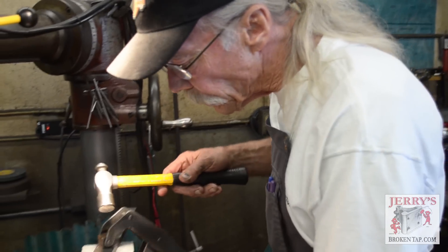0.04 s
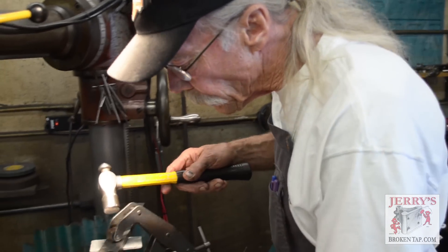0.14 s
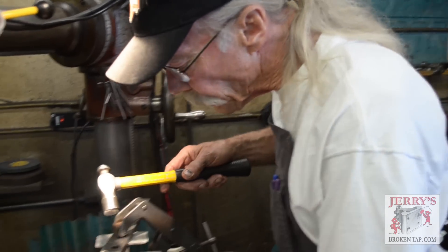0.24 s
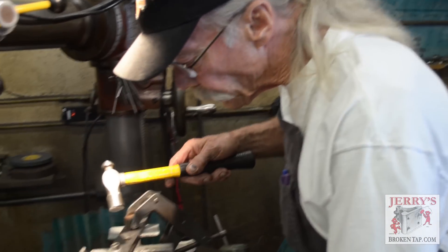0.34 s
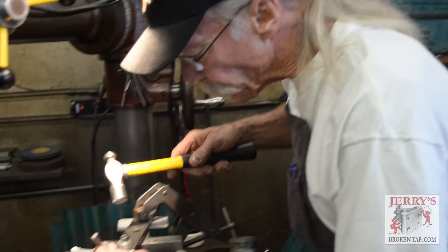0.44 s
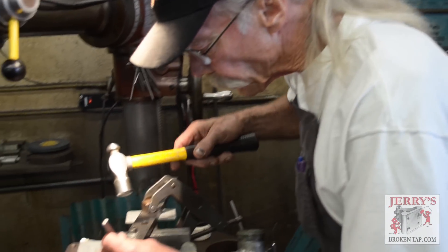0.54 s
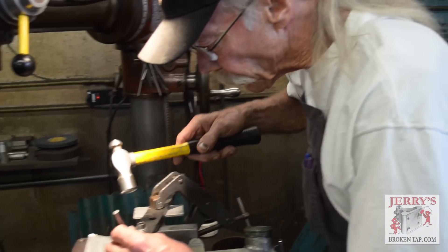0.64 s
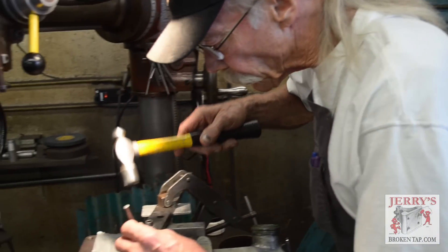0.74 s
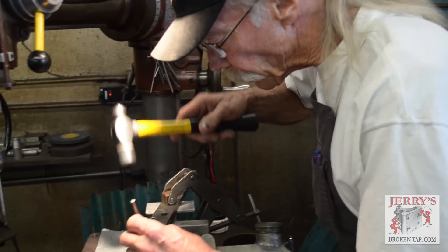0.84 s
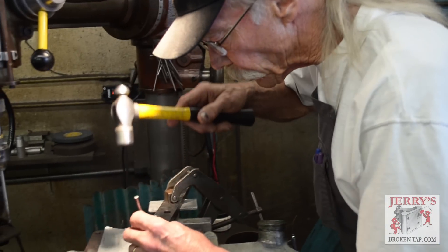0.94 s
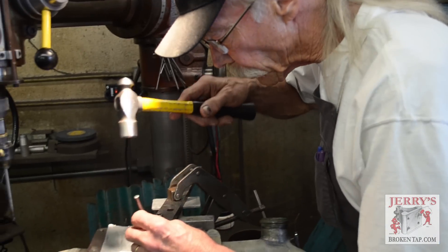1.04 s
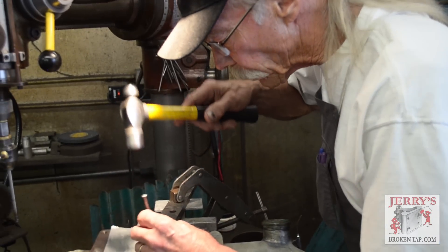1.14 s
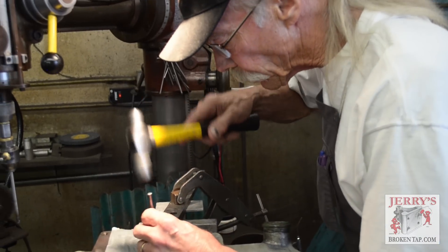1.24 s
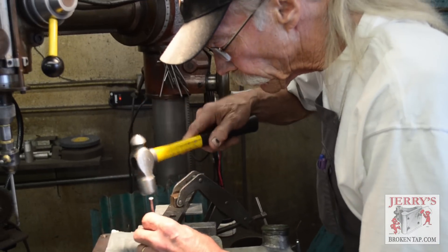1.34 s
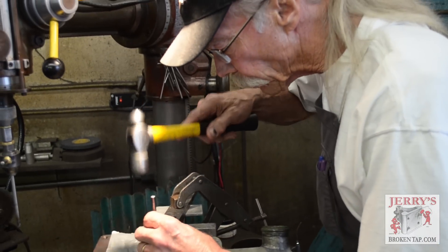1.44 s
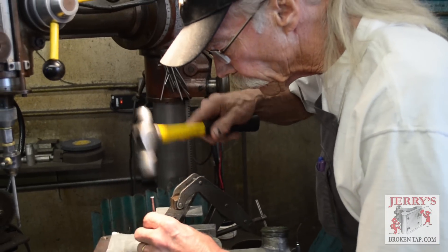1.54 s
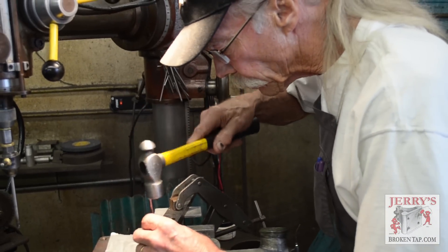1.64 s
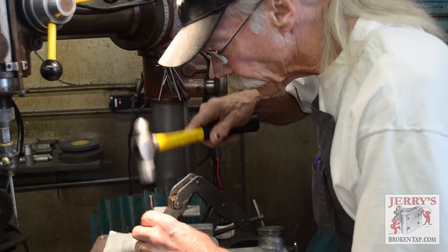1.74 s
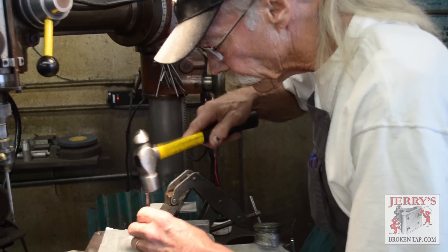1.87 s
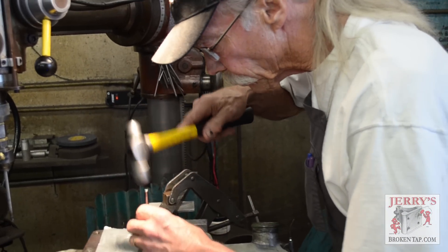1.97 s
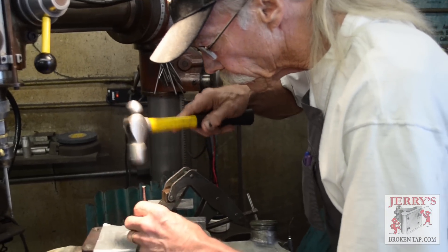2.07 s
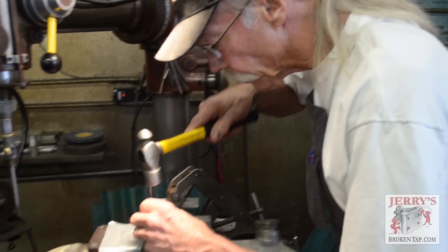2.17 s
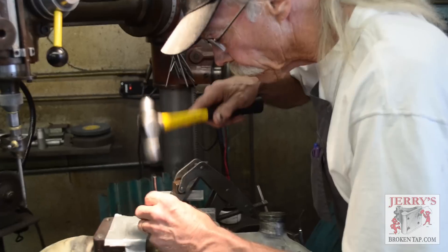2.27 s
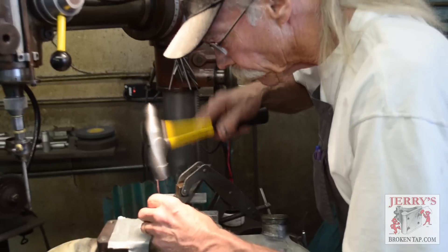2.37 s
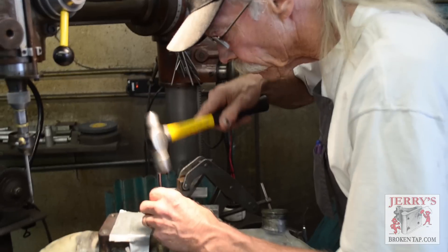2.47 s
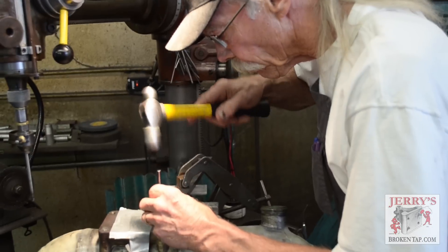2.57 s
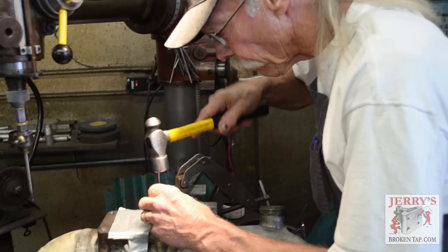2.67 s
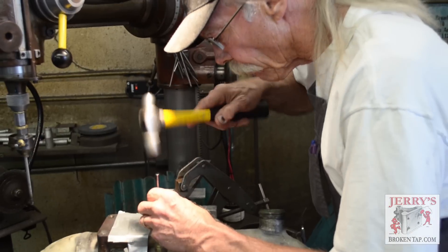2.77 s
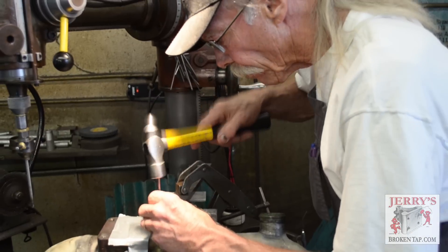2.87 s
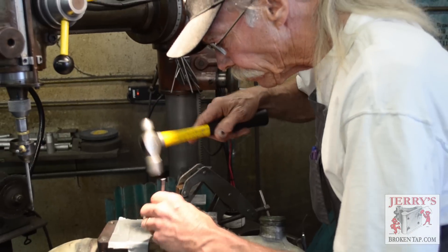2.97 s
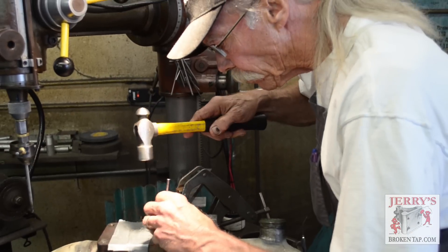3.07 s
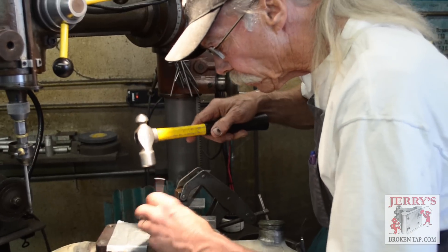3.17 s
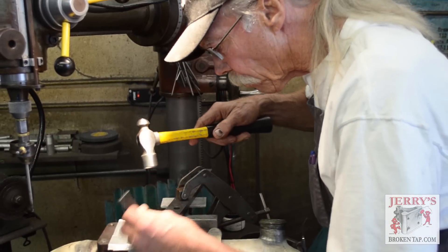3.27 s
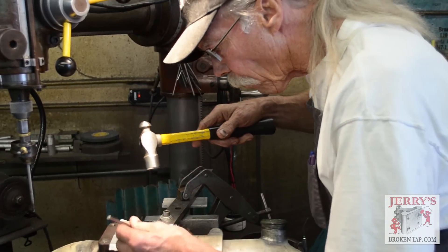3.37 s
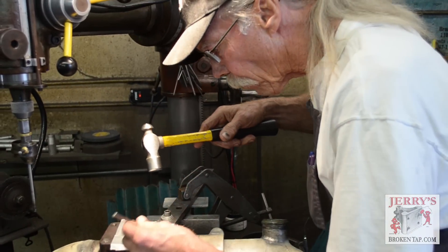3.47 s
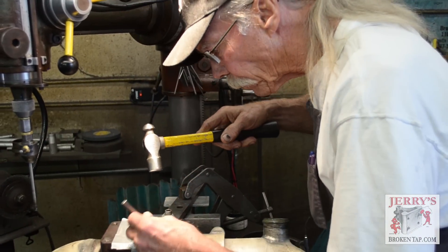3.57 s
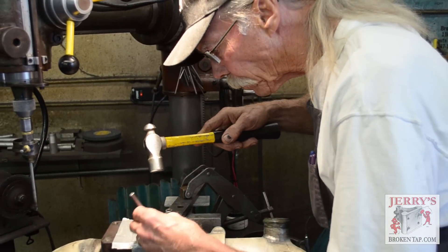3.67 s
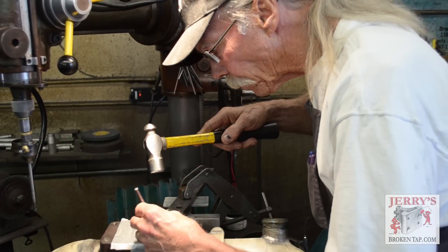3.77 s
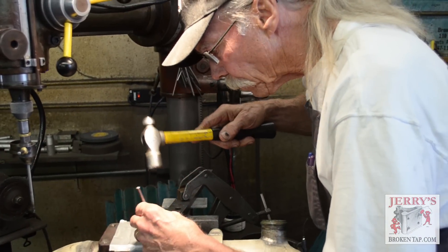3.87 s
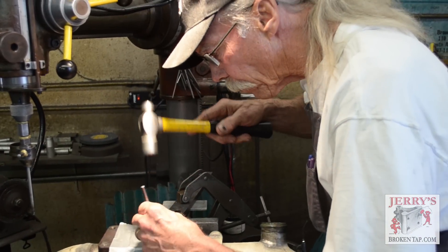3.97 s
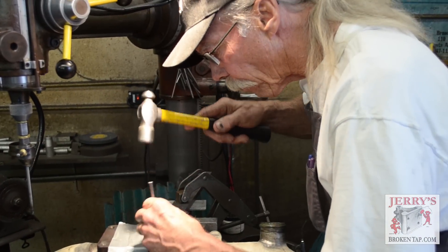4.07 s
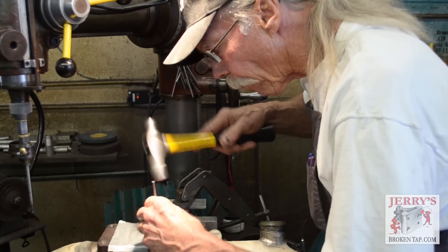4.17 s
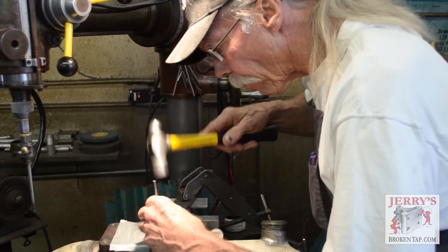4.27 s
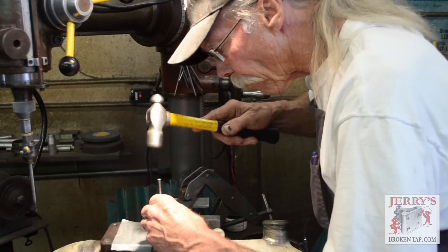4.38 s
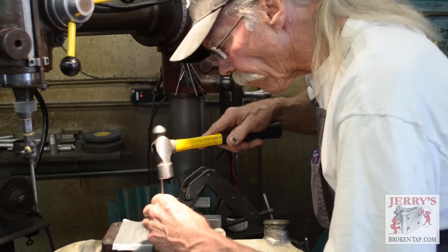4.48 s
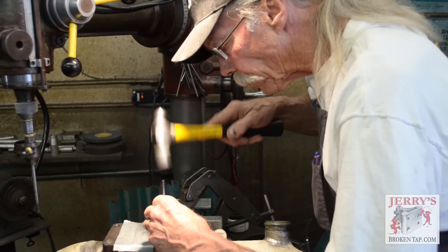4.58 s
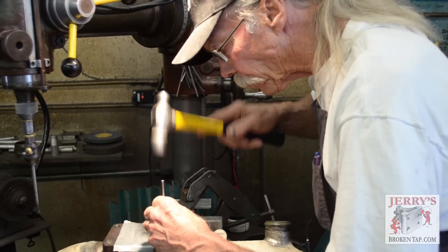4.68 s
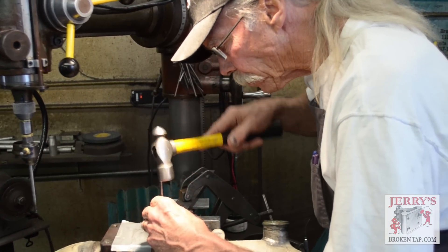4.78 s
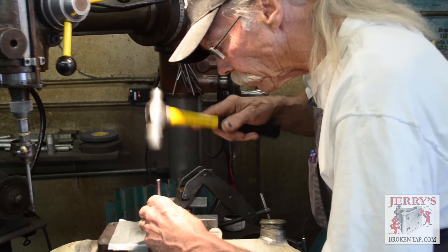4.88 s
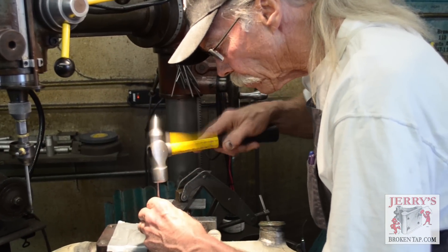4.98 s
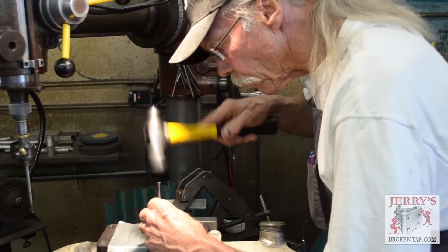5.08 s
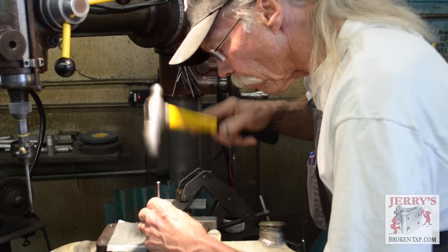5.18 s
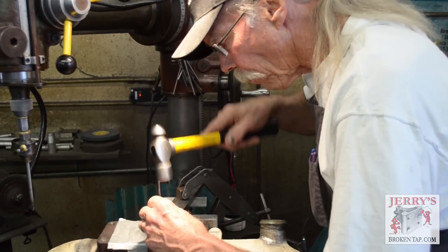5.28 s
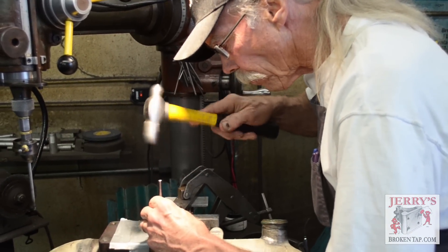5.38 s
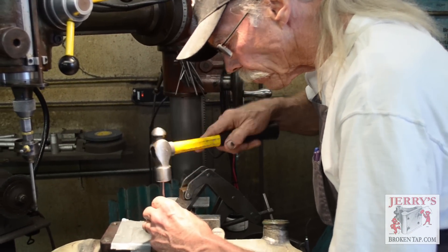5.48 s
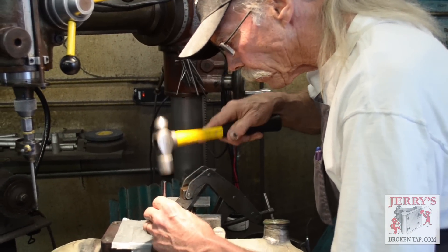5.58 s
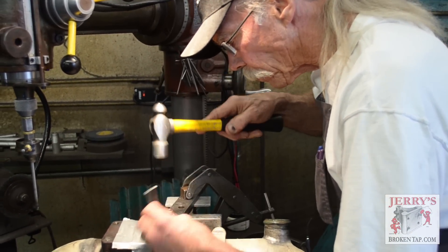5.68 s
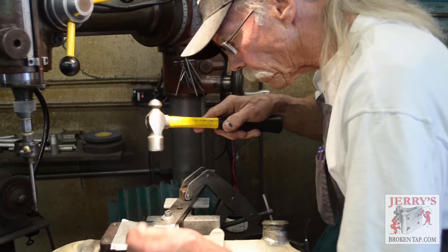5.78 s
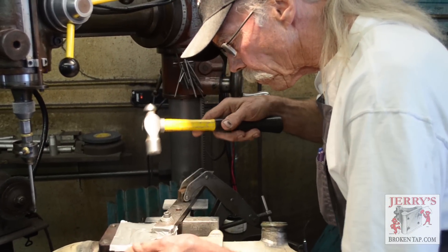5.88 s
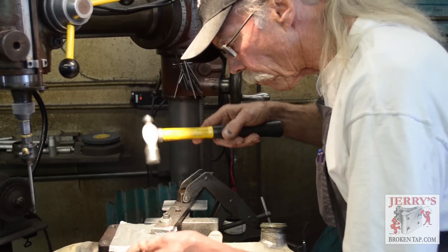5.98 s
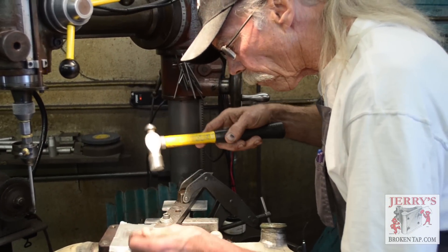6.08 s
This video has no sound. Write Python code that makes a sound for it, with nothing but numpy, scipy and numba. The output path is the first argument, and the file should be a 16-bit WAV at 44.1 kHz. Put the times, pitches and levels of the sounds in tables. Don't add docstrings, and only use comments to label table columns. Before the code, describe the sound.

A low, slightly breathing hum and rush of distant motors runs throughout, with faint thin whines. From about 0.5 to 1.3 s, soft cloth and skin rustle comes with small clicks and dull knocks as a punch is set on clamped cast iron. A light hammer tap lands at 1.3 s, then six firmer blows from 1.6 to 2.9 s, roughly a quarter second apart. Each is a hard steel crack with a short damped knock, a bright clang, a longer table ring and a low, beating frame thump, filling the hard-walled shop. The ring dies away; little ticks at 3.2 s and a faint knock at 3.8 s mark the punch being moved. A second run begins more lightly at 4.2 s, then five stronger blows follow until 5.5 s, varying in brightness. The ringing fades into machine hum by 6 s. The close camera microphone ducks and rounds the peaks.

```python
import sys
import numpy as np
from scipy import signal
from scipy.fft import rfft, irfft
from scipy.io import wavfile
from scipy.ndimage import uniform_filter1d
from numba import njit

SR = 44100
rng = np.random.default_rng(int(sys.argv[2]) if len(sys.argv) > 2 else 0)


def unload_wav(signal):
    wavfile.write(
        sys.argv[1],
        SR,
        np.round(np.clip(np.atleast_2d(signal).T, -1, 1) * 32767).astype(np.int16),
    )


def ratio_of_db(decibels):
    return 10 ** (np.asarray(decibels, float) / 20)


N = 269892
ECHO_LENGTH = 40000


def across(table, hz):
    points = np.array(sorted(table), float)
    return np.interp(np.log(np.maximum(hz, 1)), np.log(points[:, 0]), points[:, 1])


def shaped(x, table):
    hz = np.arange(len(x) // 2 + 1) * SR / len(x)
    return irfft(rfft(x) * ratio_of_db(across(table, hz)), len(x))


def resonant(hz, width, db):
    peak = signal.iirpeak(hz, hz / (1.5 * width), fs=SR)
    x = signal.lfilter(*peak, signal.lfilter(*peak, rng.standard_normal(N)))
    return x * ratio_of_db(db) / x.std()


def walk(rate):
    steps = rng.standard_normal(int(N * rate / SR) + 2)
    x = uniform_filter1d(np.repeat(steps, int(SR / rate) + 1)[:N], int(SR / rate))
    return x / x.std()


def add(out, s, x):
    i = int(s * SR)
    out[i:i + len(x)] += x[:N - i]


# (frequency [Hz], density [dB per Hz])
RUSH_COLOUR = [(12, -53.5), (20, 0.5), (37, -27), (53, -4.5), (104, 0.5), (150, -7.5), (216, -4), (388, -9),
               (422, -9), (1530, -12.5), (2460, -25), (3530, -25.5), (4060, -36), (13200, -53.5),
               (16000, -82)]
# (frequency [Hz], width [Hz], level [dB])
MOTOR_WHINES = [(73, 16, -56.5), (121, 9.6, -65), (2560, 390, -86.5), (3020, 40, -73.5), (3600, 39, -73.5)]


def machines():
    breath_db = 0.77 * walk(0.72) + 0.8 * walk(20.79)
    rush = shaped(rng.standard_normal(N), RUSH_COLOUR) * ratio_of_db(breath_db)
    whine = sum(resonant(hz, width, db) for hz, width, db in MOTOR_WHINES)
    return rush * ratio_of_db(-49) / rush.std() + whine


# (time [s], level [dB])
RUSTLE = [
    (0, -96),
    (.45, -74),
    (.7, -62),
    (1.25, -73),
    (1.5, -81),
    (6.2, -80),
]


def rustle():
    cloth = resonant(2300, 800, 0)
    level_db = np.interp(np.arange(N) / SR, *np.transpose(RUSTLE))
    return cloth * ratio_of_db(level_db + 2.5 * walk(9.1))


def crack(colour, hold_s, fall_s):
    t = np.arange(4096) / SR
    rise = np.minimum(1, t / 0.0013)
    fall = np.minimum(1, np.exp((hold_s - t) / fall_s))
    return shaped(rng.standard_normal(4096), colour) * fall * rise


def ring(modes, colour, scatter_db, rise_turns, size, turns=0.5, spread=0., count=1, order=1, cast=None):
    hz, db, t60 = np.repeat(np.transpose(modes), count, axis=1)[:, :, None]
    t = np.arange(size) / SR
    chance = rng.standard_normal((3, len(hz), 1))
    hz = hz * (1 + spread * (chance[2] if cast is None else cast))
    rise = 1 - np.exp(-t * hz / rise_turns)
    fade = np.exp(-np.log(1000) * (t / np.clip(t60, .01, 2)) ** order)
    swing = np.sin(2 * np.pi * (hz * t + turns * chance[1]))
    level = ratio_of_db(db + across(colour, hz) + scatter_db * chance[0])
    return (level * rise * fade * swing).sum(axis=0)


# (time [s], click level
# [dB], knock level [dB], tip ring level [dB])
TOUCHES = [(.506, -56, -62, -84), (0.729, -62, -44, -62), (0.823, -69, -48.5, -77),
           (0.889, -71.5, -45.5, -84), (.93, -60, -59, -72), (1.089, -66, -56, -73), (1.126, -88, -50, -76),
           (1.172, -68, -68, -72), (1.289, -42.5, -37.5, -63), (3.182, -60, -54, -59),
           (3.199, -45, -38, -47), (3.801, -72, -50.5, -84), (4.106, -46.5, -42, -62),
           (4.2121, -8.5, -49.5, -72)]
# (frequency [Hz], level [dB], t60 [s])
PIECE_MODES = [(657.6, 1, 0.095), (740, 0.5, 0.06), (947, -0.5, 0.047), (1009, 8, 0.034),
               (1099, -12.5, 0.1), (1270, 8, 0.02), (1295, 6.5, 0.034), (1730, 0.5, 0.034),
               (2214, -28.5, 0.033), (2854, -6, 0.11), (3528, 1.5, 0.045), (5130, -3.5, 0.077),
               (6230, 1.5, 0.037), (8580, 1.5, 0.04), (10200, -34, 0.046), (11840, -23.5, 0.05)]
# (frequency [Hz], level [dB], t60 [s])
TIP_MODES = [(9900, -11, .03), (10200, -9.5, .045), (10700, -12, .025)]


def punch():
    out = rustle()
    for s, click_db, knock_db, tip_db in TOUCHES:
        click = [(500, click_db - 13.5), (3000, click_db), (11000, click_db - 17), (14000, click_db - 27)]
        add(out, s, crack(click, hold_s=0.006, fall_s=0.0044))
        knock = ring(PIECE_MODES[3:7], [(1100, knock_db - 2.5)], scatter_db=-3.0, rise_turns=1.44,
                     spread=0.04, count=4, size=8000)
        add(out, s, ratio_of_db(-3.5) * knock)
        ping = ring(TIP_MODES, [(10000, tip_db)], scatter_db=-2.0, rise_turns=9.0,
                    spread=0.0226, count=5, size=8000)
        add(out, s, ratio_of_db(-3) * ping)
    return out


# (frequency [Hz], t60 [s])
SHOP_T60 = [(60, 1), (200, 0.36), (600, 0.74), (1500, 0.53), (3000, 0.59), (6000, 0.47), (12500, 0.34),
            (15000, 0.24)]
# (frequency [Hz], level [dB])
SHOP_DB = [(60, -29.5), (200, -8.5), (600, -22.5), (1500, -24.5), (3000, -23), (6000, -25), (10000, -23.5),
           (15000, -24.5)]


def shop():
    t = np.arange(ECHO_LENGTH) / SR
    noise, tail = rfft(rng.standard_normal(ECHO_LENGTH)), 0
    octave = np.log2(np.maximum(np.arange(len(noise)) * SR / ECHO_LENGTH, 1))
    for hz in 45 * 2 ** np.arange(0, 9, .5):
        band = irfft(noise * np.clip(1 - 2 * abs(octave - np.log2(hz)), 0, 1), ECHO_LENGTH)
        tail = tail + band * ratio_of_db(across(SHOP_DB, hz) - 60 * t / across(SHOP_T60, hz))
    return tail * np.clip((t - .004) / 0.0015, 0, 1)


# (frequency [Hz], level [dB])
WASH = [(90, -3.5), (450, -5), (1100, 1), (1900, 4), (2300, -0.5), (2800, -6), (3300, -5), (4500, -9),
        (5300, -7.5), (7000, -4), (8400, -4), (9600, -10), (11300, -6.5), (14000, -13.5)]
# (frequency [Hz], half width [Hz])
PARTS = [
    (1120, 140),
    (2800, 90),
    (4000, 210),
    (5260, 236),
    (8500, 360),
    (11300, 490),
]
# (plain [dB], seated [dB], light blow [dB], off square [dB], head ring share [0-1])
GRIP = [
    (-0.8, -4.5, 13.5, 5.5, 0.1),
    (6, -7.5, -15.5, 21.5, 0.06),
    (6.5, 2, 10.5, -8, 0.4),
    (6.5, -0.5, 4, 0.5, 1),
    (-7.5, 3.5, -6.1, 11, 0.5),
    (-1.5, -4.5, 5.5, -7.5, 0.2),
]


def wash(echoes, colour, manner, head_db):
    x = shaped(shaped(echoes, WASH), colour)
    extra_db = np.dot(GRIP, [*manner, head_db])
    hz = np.arange(len(x) // 2 + 1) * SR / len(x)
    lift = sum(db / (1 + ((hz - f) / width) ** 2) for db, (f, width) in zip(extra_db, PARTS))
    ripple = np.interp(hz, np.linspace(2000, 16000, num=28), rng.standard_normal(28), left=0)
    return irfft(rfft(x) * ratio_of_db(lift + 2.5 * ripple), len(x))[:26000]


def piece_knock(colour):
    return ring(PIECE_MODES, colour, scatter_db=1.5, rise_turns=3.5, spread=.03, count=6, size=8000)


# (plain [dB], seated [dB], light blow [dB], off square [dB])
ARM_DB = (-4.5, -8.5, 18, 6)


def clamp_arm(force_db, manner):
    mode = (1116, force_db + np.dot(ARM_DB, manner), 0.031)  # Hz, dB, t60 s
    return ring([mode], [(1000, 0)], scatter_db=3.5, rise_turns=3., size=8000)


TABLE_HZ = [468, 526, 632, 678, 750, 843, 947, 1010, 1060, 1106, 1172, 1232, 1319, 1352, 1486, 1723, 1792,
            1884, 1999, 2110, 2250, 2762, 2821, 4199, 5250]
# (level [dB], t60 [s])
TABLE_RING = [(-16, 0.14), (-20, 0.2), (-3.5, 0.46), (-1, 0.25), (-9.5, 0.29), (-2, 0.2), (-26, 0.26),
              (-21.5, 0.23), (-14, 0.35), (-9, 0.69), (-7.5, 0.12), (-14.5, 0.21), (-10.5, 0.54),
              (-0.5, 0.46), (-4, 0.31), (-13, 0.86), (-2, 0.63), (-16, .42), (-6, 0.58), (-12, .42),
              (-27, 0.41), (-13.5, 0.71), (-19.5, 0.38), (-13.5, 0.62), (-27.5, 0.35)]


def table_ring(colour, cast):
    modes = np.column_stack([TABLE_HZ, TABLE_RING])
    return ring(modes, colour, scatter_db=3.0, spread=0.0058, count=3, cast=cast, rise_turns=8.4, size=26000)


# (frequency [Hz], level [dB], time to die [s])
NEAR_FEET = [(132.4, -3.5, 0.41), (169.4, -7.5, 0.68), (183.4, -6, 0.44), (304, -6, 0.47),
             (358, -4.5, 0.13)]
# (frequency [Hz], level [dB], time to die [s])
FAR_FEET = [(142.4, -16.5, 0.17), (190.1, -4, 0.5), (301, -10.5, .2)]


def frame_thump(colour):
    near = ring(NEAR_FEET, colour, scatter_db=1.5, rise_turns=2.3, turns=0.023, size=26000, order=2)
    far = ring(FAR_FEET, colour, scatter_db=4.0, rise_turns=2.6, turns=.04, size=26000, order=2)
    return near - far


# (time [s], force [dB], punch seating [0-1], off square [0-1], hammer head ring [dB])
BLOWS = [(1.3156, -23.5, 0.22, 0.03, -6), (1.6312, -9.5, 0.28, 0.33, 6.5), (1.8972, -7.5, 0.15, 0.36, 0.5),
         (2.1606, -12, 0.94, .46, -1), (2.4148, -7, 0.76, 0.33, 9), (2.649, -8, 0.8, 0.37, 0),
         (2.8988, -5.5, 0.47, 0.28, 6), (4.2137, -13.5, 0.24, 1, 7), (4.4903, -2.5, 0.44, 0.18, -8),
         (4.7509, -4.5, 0.76, 0.73, -1), (5.003, -0.5, 0.39, 0.32, -7.5), (5.246, -2, 0.57, 0.45, 2),
         (5.4833, -4, 0.74, 0.59, -1)]
COLOUR_HZ = [10000, 200, 1000, 2800, 5300]
# (plain [dB], seated [dB], light blow [dB], off square [dB])
COLOUR = [
    (-22, 6.5, 6.4, -3.5),
    (-17, 16, 4, -0.5),
    (0.5, -0.5, 1, 0.5),
    (-14, 3.5, 1.5, 2.5),
    (-22, 1.4, 7.5, 8),
]


def hammer(echoes):
    knock, tail = np.zeros(N), np.zeros(N)
    side = np.tile([[0], [-1], [1]], (len(TABLE_RING), 1))
    cast = (1 + .3 * rng.standard_normal((3 * len(TABLE_RING), 1))) * side
    for s, force_db, seated, slant, head_db in BLOWS:
        light = force_db / -20
        manner = np.array([1, seated, light, slant])
        db = force_db + np.dot(COLOUR, manner)
        colour = list(zip(COLOUR_HZ, db))
        full = s + 0.001767 + .003 * light ** 2
        edge = colour + [(60, -49.5), (13500, db[0] - 3.0)]
        add(tail, s, ratio_of_db(9.0) * crack(edge, hold_s=0.0032, fall_s=0.0029))
        add(knock, full, ratio_of_db(-8.5) * piece_knock(colour))
        add(tail, full, ratio_of_db(7.0) * clamp_arm(force_db, manner))
        add(tail, full, ratio_of_db(-13.0) * table_ring(colour, cast))
        add(tail, full, ratio_of_db(-15) * frame_thump(colour))
        add(tail, s, ratio_of_db(25.0) * wash(echoes, colour, manner, head_db))
    return knock, tail


def scene():
    echoes = shop()
    knock, tail = hammer(echoes)
    touch = punch()
    wet = signal.fftconvolve(ratio_of_db(-17) * knock + ratio_of_db(-12) * touch, echoes)[:N]
    return (knock + tail + touch + wet + machines())[None]


@njit
def squeeze(x, top, ratio, attack, release):
    y, e = np.empty(len(x)), 0.
    for i in range(len(x)):
        e += (abs(x[i]) - e) * (attack if abs(x[i]) > e else release)
        y[i] = x[i] * min(1., (top / (e + 1e-9)) ** (1 - 1 / ratio))
    return y


def roll_off(x):
    return signal.sosfilt(signal.butter(12, 16510, fs=SR, output="sos"), x)


def record(dry):
    held = squeeze(dry[0], ratio_of_db(-11.0), 2.8, 1 / (0.004 * SR), 1 / (.06 * SR))
    rounded = np.tanh(0.98 * held) / 0.99
    mic = shaped(rounded, [(30, -3.5), (100, -0.5), (14200, -1.5), (14700, -8.5), (15400, -36.5),
                           (16200, -45.5), (17000, -63.5)])
    return roll_off(mic[None])


dry = scene()
out = record(dry)
unload_wav(out)
```